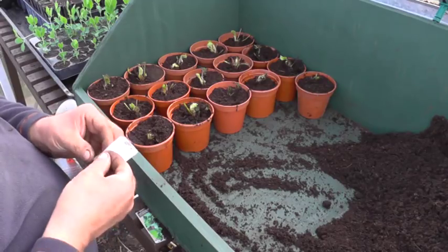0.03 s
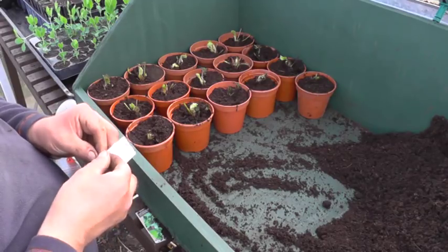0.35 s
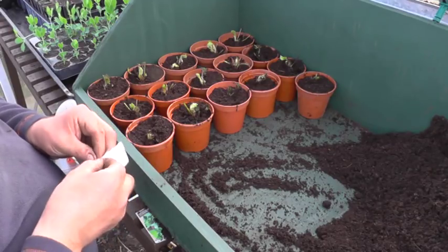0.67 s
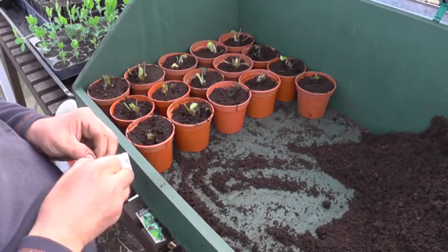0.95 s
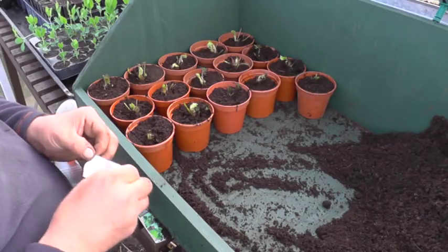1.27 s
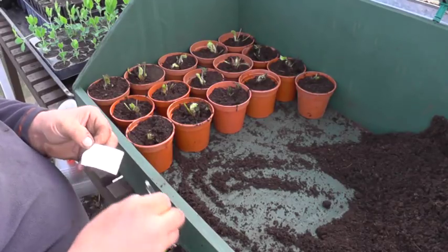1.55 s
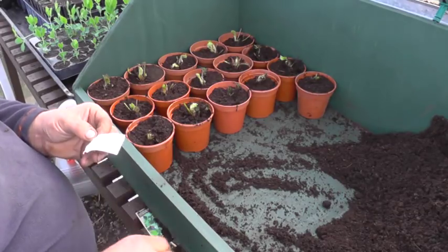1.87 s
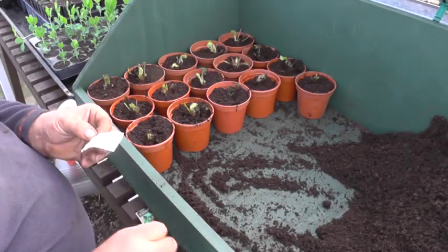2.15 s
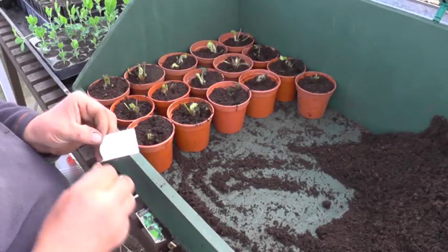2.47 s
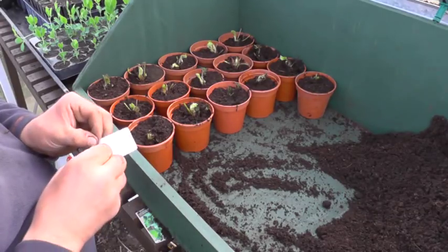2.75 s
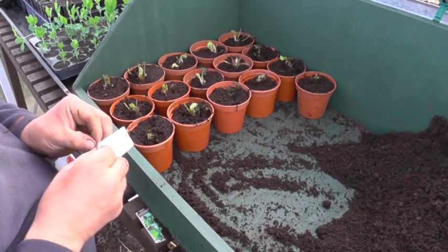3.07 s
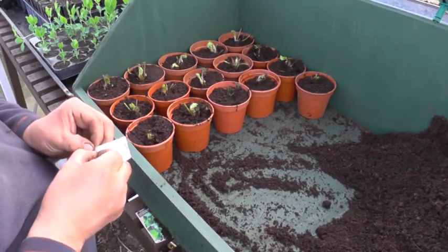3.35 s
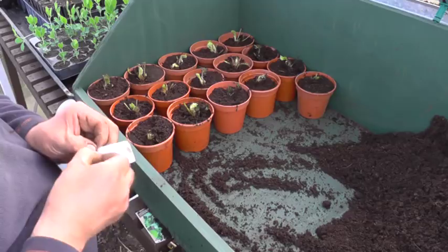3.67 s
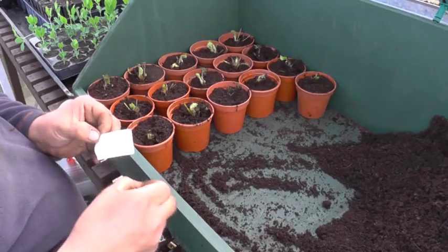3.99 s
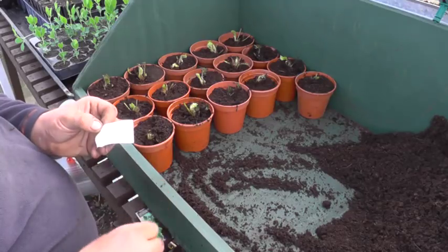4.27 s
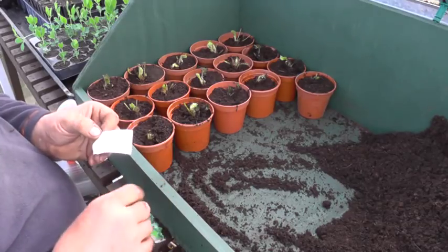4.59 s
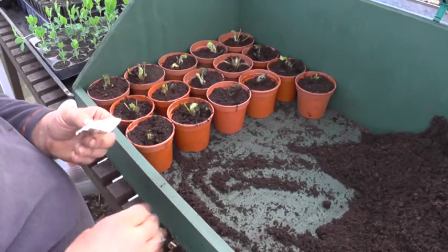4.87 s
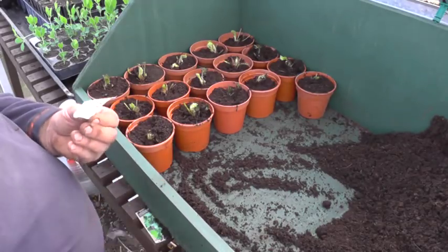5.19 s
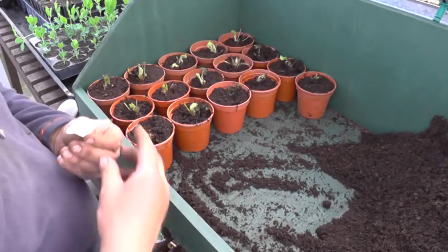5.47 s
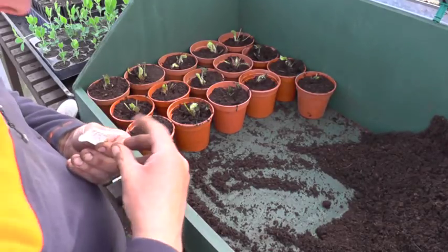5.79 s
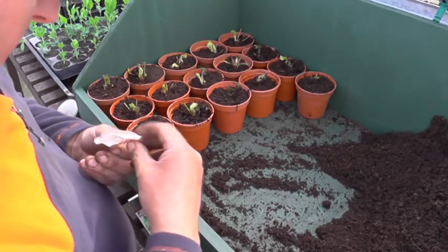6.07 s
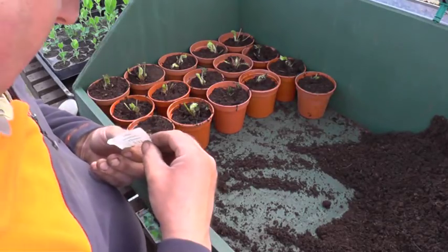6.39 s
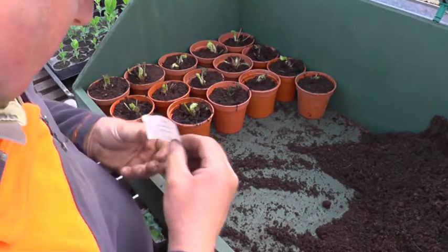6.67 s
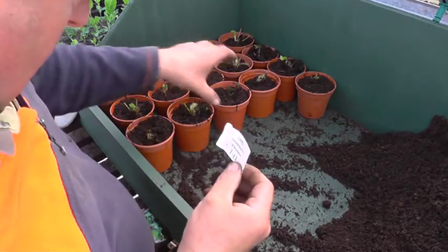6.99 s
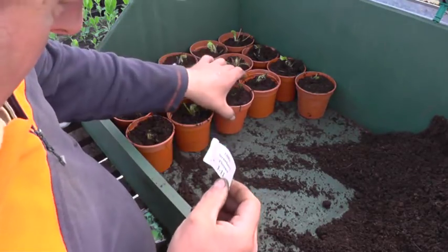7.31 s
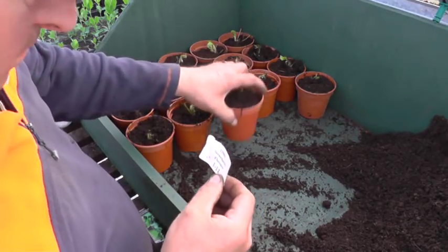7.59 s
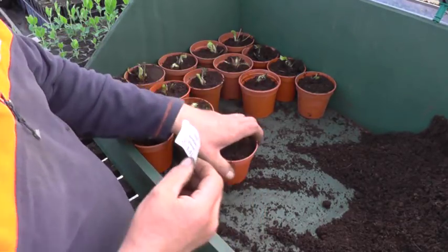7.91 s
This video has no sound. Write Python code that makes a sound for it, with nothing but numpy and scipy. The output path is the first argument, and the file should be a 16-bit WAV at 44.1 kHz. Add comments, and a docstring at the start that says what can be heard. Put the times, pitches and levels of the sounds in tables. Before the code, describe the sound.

Close by, fingernails tick at a sticky paper label, which peels from its backing in a quick run of snaps. After more light picking comes a second, shorter and louder rip. Fingers and sleeves rustle with faint taps on plastic, then a plant pot scrapes briefly over a gritty tray and bumps it with low knocks. Behind is a quiet garden with a faint, distant bird.

```python
"""Sticky paper labels are picked at and peeled off their backing: the glue lets go in runs of snaps.
Each pull speeds up or slows down as its force fades. Fingers and sleeves rustle at a potting bench,
then a plastic pot is gripped, dragged over a gritty tray and bumped against it.
Behind lies a quiet garden with a far bird. The microphone's automatic volume dips after loud rips."""
import sys
import numpy as np
from scipy import signal
from scipy.fft import rfft, irfft, next_fast_len
from scipy.io import wavfile
from scipy.ndimage import uniform_filter1d, map_coordinates

SR = 44100
rng = np.random.default_rng(int(sys.argv[2]) if len(sys.argv) > 2 else 0)


def bounce(signal):
    """Save signal as a 16-bit WAV file at the path given by the first command-line argument."""
    frames = np.transpose(np.atleast_2d(signal))
    limited = np.clip(frames, -1, 1)
    pcm = np.round(limited * 32767).astype(np.int16)
    wavfile.write(sys.argv[1], SR, pcm)


N = 355005
TIME = np.arange(N) / SR


def amp(db):
    """Turn decibels into a multiplier."""
    return 10 ** (np.asarray(db) / 20)


def unit(x):
    """Scale x to an average power of 1."""
    return x / np.sqrt(np.mean(x ** 2) + 1e-20)


def along(points, hz):
    """Read between (frequency, value) points on a log frequency axis."""
    f, v = np.transpose(points)
    return np.interp(np.log(hz + 1), np.log(f + 1), v)


def wobble(rate):
    """A smooth random curve through `rate` points a second."""
    return map_coordinates(rng.standard_normal(int(N * rate / SR) + 4), [TIME * rate])


def filtered(x, response):
    """Multiply each frequency in x by response(hz)."""
    n = x.shape[-1]
    padded = 2 * next_fast_len(n // 2 + 2048)
    return irfft(rfft(x, padded) * response(np.fft.rfftfreq(padded, 1 / SR)), padded)[..., :n]


def causal(db):
    """A filter with these gains that never sounds before the hit (minimum phase)."""
    cepstrum = irfft(np.log(amp(db)))
    half = len(cepstrum) // 2
    cepstrum[1:half] *= 2
    cepstrum[half + 1:] = 0
    return np.exp(rfft(cepstrum))


def stereo(pair, width):
    """Turn a middle and a side signal into left and right; more side sounds wider."""
    mid, side = filtered(pair, lambda hz: amp(np.array([0 * hz, along(width, hz)])))
    return np.array([mid + side, mid - side])


def add(track, s, sound):
    """Mix a sound in at s seconds."""
    part = track[:, max(round(s * SR), 0):][:, :sound.shape[-1]]
    part += sound[..., :part.shape[1]]


def burst(t60):
    """Two puffs of noise of set energy; t60 is the seconds they take to fade by 60 dB."""
    t = TIME[:SR // 5]
    noise = rng.standard_normal((2, len(t))) * amp(-60 * t / t60)
    return noise / np.linalg.norm(noise, axis=1, keepdims=True) * np.sqrt(SR / 1000)


# tone of the outdoor air: f/Hz, level/dB
GARDEN_TONE = [(20, -12.5), (45, -1), (85, 3.5), (160, -2.5), (260, -6.5), (480, -5), (680, -12.5),
               (900, -10.5), (1300, -20.5), (1700, -18), (2120, -22.5), (2450, -32.5), (4500, -35.5),
               (14000, -38.5)]
# how wide it sounds: f/Hz, side over middle/dB
GARDEN_WIDTH = [(60, -25), (180, -16), (550, -12), (1650, -12), (4970, -10), (15000, 2.5)]
def garden(patchy_db=2.56, level_db=-57.0, hum_db=-76.0, hum_hz=119.7):
    """A distant outdoor rumble whose pitches come and go, with a faint hum."""
    spectra = signal.stft(rng.standard_normal((2, N)), nperseg=2048)[2]
    patches = uniform_filter1d(rng.standard_normal(spectra.shape[1:]), size=3, axis=0)  # blur in pitch
    patches = uniform_filter1d(patches, size=16, axis=1)  # and in time
    patchy = signal.istft(spectra * amp(patchy_db * unit(patches)), nperseg=2048)[1][:, :N]
    air = unit(filtered(stereo(patchy, GARDEN_WIDTH), lambda hz: amp(along(GARDEN_TONE, hz))))
    hum = amp(hum_db + 2.5 * wobble(8.6)) * np.sin(2 * np.pi * hum_hz * TIME)
    return air * amp(level_db + 1.1 * wobble(1.6) + 0.59 * wobble(29)) + hum


def crack():
    """Fibres tear for about a millisecond, equally strong at every frequency."""
    spectrum = rfft(burst(.003)[:, :96])
    return irfft(spectrum / np.abs(spectrum)) * np.sqrt(SR / 1000)


# tone of snapping paper: f/Hz, level/dB
PAPER_TONE = [(40, -15), (260, -9.5), (500, -1.5), (880, -2), (1200, -3.5), (1500, -9.5), (1900, -2),
              (2400, -9.5), (3000, -2.5), (4500, -2), (6000, 0), (10000, -1.5), (15000, -8)]
# echoes from nearby surfaces: delay/s, level/dB
ECHOES = [(.0011, -16), (.0027, -9), (.0035, -13.5), (.0047, -15.5)]
def snap(body_db, top_db, flap_hz, taut_hz, flap_db, bench_t60, bench_db, taut_db=4.0):
    """Paper snaps: a sharp crack, its echoes, a flutter of the sheet and a shudder of the bench."""
    flutter = amp(-2.5) * burst(.024)
    blow = flutter + amp(bench_db) * burst(bench_t60)
    tear = crack()
    add(blow, 0, tear)
    for delay, db in ECHOES:
        add(blow, delay * (1 + 0.046 * rng.standard_normal()), amp(db) * tear)  # the hands keep moving
    tilt = [(1200, body_db), (5500, 0.0038), (11000, top_db)]
    flap = lambda hz: flap_db / (1 + ((hz - flap_hz) / 140) ** 2)  # the loose end rings
    taut = lambda hz: taut_db / (1 + ((hz - taut_hz) / 650) ** 2)  # so does the stretched paper
    return filtered(blow, lambda hz: causal(along(PAPER_TONE, hz) + along(tilt, hz) + flap(hz) + taut(hz)))


# how wide paper and fingers sound: f/Hz, side over middle/dB
PAPER_WIDTH = [(60, -5.5), (150, -4), (380, -7.5), (950, -4.5), (2380, -16), (5980, -8), (15000, 3.5)]
# spells of fumbling: start/s, end/s, level/dB
FUMBLING = [(0.054, 1.14, -57.5), (2.75, 3.561, -61), (5.601, 6.616, -57)]
# nails tick on paper edges: t/s, level/dB, body (low tones)/dB, top (high tones)/dB
NAIL_TICKS = [(.002, -39, -3, -9), (0.4837, -57, -20, 10.5), (0.7676, -44, 2, -10), (0.8434, -39, -19, -14),
              (0.9544, -54.5, -16, -9), (1.092, -59, 5.5, 20), (3.0349, -47.5, 0.5, -4),
              (3.3158, -42.5, 4, -2.5), (3.531, -53.5, -3, -9), (5.3917, -59, 1, 8), (5.6625, -49, 11, 5.5),
              (5.9476, -49.5, -6, -8), (6.04, -57, -13, 11), (6.145, -55.5, 8, -7), (6.6753, -27, -8, -10),
              (7.1691, -38, 4, -19), (7.1993, -43.5, 4, -8)]
def picking(faint_per_s=5, spread_db=2.5, faint_top_db=-3):
    """Nails pick at the corners: a few clear ticks among faint random ones."""
    out, faint = np.zeros((2, N)), []
    for start, end, db in FUMBLING:
        for place, strength in rng.random((round((end - start) * faint_per_s), 2)):
            s = start + place * (end - start)
            faint.append((s, db + spread_db * (2 * strength - 1), 0, faint_top_db))
    for s, db, body_db, top_db in NAIL_TICKS + faint:
        tick = snap(body_db, top_db, flap_hz=994, taut_hz=6500, flap_db=7.5,
                    bench_t60=0.094, bench_db=-4.5)
        add(out, s, amp(db) * tick)
    return stereo(out, PAPER_WIDTH)


# tone of rubbing fibres: f/Hz, level/dB
RUSTLE_TONE = [(100, -21), (500, 6), (1200, -4), (2400, -4.5), (4000, 1), (6000, 1.5), (10000, -1),
               (13000, -7), (15500, -13.5)]
# skin, paper and cloth slide: t/s, length/s, relative level/dB, top/dB
RUBS = [(0.064, 0.19, -61, -4), (0.4, 0.2, -64, 1.5), (2.751, 0.047, -61.5, -6), (2.89, 0.31, -75, -3),
        (3.405, 0.049, -59, -1.5), (4.528, 0.048, -58, 3), (4.814, 0.036, -62, 3),
        (4.916, 0.05, -57.5, 7.5), (5.05, 0.063, -45, 1.5), (5.114, 0.14, -48.5, 1),
        (5.594, 0.56, -68.5, 3), (6.531, 0.18, -55, -6), (7.157, 0.16, -51.5, -3.5),
        (7.316, 0.092, -62, -4), (7.534, 0.057, -53, -1.5), (7.603, .13, -61.5, -9), (7.717, 0.14, -45, -3),
        (7.862, 0.062, -38, -5.5), (7.923, 0.15, -52.5, -8)]
def rustle(grain_db=1.5, clump_db=1.7, level_db=-5, attack_s=0.011, release_s=0.033):
    """Sliding fibres catch and slip, so each rub makes a grainy hiss."""
    out = np.zeros((2, N))
    fibres = rng.standard_normal((2, N)) * amp(grain_db * wobble(900) + clump_db * wobble(90))
    hiss = unit(filtered(stereo(fibres, PAPER_WIDTH), lambda hz: causal(along(RUSTLE_TONE, hz))))
    for s, length, db, top_db in RUBS:
        end = length + release_s / 2
        part = hiss[:, round(s * SR):round((s + end) * SR)]
        t = TIME[:part.shape[1]]
        pressure = np.clip(np.minimum(t / attack_s, (end - t) / release_s), 0, 1)
        tilt = [(6500, 0), (11000, top_db)]
        add(out, s, filtered(amp(db) * pressure * part, lambda hz: amp(level_db + along(tilt, hz))))
    return out


def slip_times(count, first_gap, last_gap, lateness):
    """When the glue slips in one pull; the higher the lateness, the later the hand changes pace."""
    gaps = first_gap + (last_gap - first_gap) * np.linspace(0, 1, round(count) - 1) ** lateness
    return np.append(0, np.cumsum(gaps))


# pulls on a label: t/s, slips, first gap/s, last gap/s, lateness, relative level/dB,
# fade/dB (below 0 it grows), body/dB, top/dB, bench/dB, loose flap f/Hz, taut paper f/Hz
LABEL_PULLS = [(0.848, 2, .0167, 0.018, 0.9, -33.5, -3, 3.5, 7.5, 0, 824, 7030),
               (1.1488, 2, 0.0016, .0017, 1, -8, 2, -4, 3.5, -10.5, 880, 6500),
               (1.1828, 10, .0157, .0079, 1.9, -11.5, 5.5, 1, 1, 0.5, 906, 4660),
               (1.3617, 10, .0098, .0288, 6.2, -19.5, 9.5, 5.5, -1, 0, 1210, 6800),
               (3.7628, 8, 0.0051, .0268, 2.11, -2.5, 25, -6.5, -0.5, -4, 800, 2880)]
def peel(peel_db=-1.5, body_per_db=0.48, bench_per_db=0.234, dulling_db=3):
    """Glue tears loose slip by slip; weaker snaps are duller, with more of the bench in them."""
    out = np.zeros((2, N))
    for s, *pace, db, fade_db, body_db, top_db, bench_db, flap_hz, taut_hz in LABEL_PULLS:
        delays = slip_times(*pace)
        for delay, progress in zip(delays, np.linspace(0, 1, len(delays))):
            lost_db = fade_db * progress ** 6.5  # the force holds, then gives way near the end
            sound = snap(body_db + body_per_db * lost_db, top_db - dulling_db * progress, flap_hz, taut_hz,
                         flap_db=6.5, bench_t60=0.099, bench_db=bench_db + bench_per_db * lost_db)
            add(out, s + delay, amp(db + peel_db - lost_db) * sound)
    return stereo(out, PAPER_WIDTH)


# chirps: t/s, length/s, first f/Hz, last f/Hz, relative level/dB
CHIRPS = [(2.013, .035, 3700, 5620, -74.5), (2.108, .03, 3900, 5300, -72), (2.165, .028, 4600, 5300, -79),
          (2.498, .025, 4500, 5600, -79), (2.543, .027, 4900, 5250, -75), (4.433, .125, 3020, 3260, -73.5)]
def bird():
    """A far bird gives faint, rising whistles."""
    out = np.zeros((2, N))
    for s, length, first_hz, last_hz, db in CHIRPS:
        pitch = np.linspace(first_hz, last_hz, int(length * SR))
        whistle = np.sin(2 * np.pi * np.cumsum(pitch) / SR)
        add(out, s, amp(db + 1.5) * np.hanning(len(pitch)) * whistle)
    return out


def boom(hz, t60, rise_s=0.0036):
    """One low note swells and dies away after a soft knock."""
    t = TIME[:SR // 3]
    return -np.sin(2 * np.pi * hz * t) * amp(-60 * t / t60) * (1 - np.exp(-(t / rise_s) ** 2))


# the tray's own notes: f/Hz, level/dB, t60/s
TRAY_NOTES = [(104, -12.5, 0.23), (128, -2.5, 0.085), (184, -4.5, 0.19), (340, 5.5, 0.05)]
# knocks on the tray: t/s, level/dB, f/Hz that the struck spot favours
TRAY_BUMPS = [(2.125, -41.5, 204), (7.198, -43, 195), (7.362, -37.5, 195), (7.773, -28, 330),
              (7.791, -23.5, 190), (7.817, -20, 98), (7.867, -14.5, 121)]
def tray(pan_db=-1.3, spread_octaves=0.37):
    """Hands and the soil-filled pot bump the tray; each spot brings out its own low notes."""
    out = np.zeros((2, N))
    for s, db, spot_hz in TRAY_BUMPS:
        for hz, note_db, t60 in TRAY_NOTES:
            share = np.exp(-(np.log2(hz / spot_hz) / spread_octaves) ** 2)
            add(out, s, amp(db + note_db) * share * boom(hz, t60))
    return out * amp([[pan_db], [-pan_db]])


# puffs of air as the second label comes free: t/s, level/dB
AIR_PUFFS = [(3.7672, -4.5), (3.7814, -14)]
def puffs(push_s=0.00059, right_lag_s=.0008):
    """Each flick of the paper pushes the air once, with no ring."""
    out = np.zeros((2, N))
    age = np.maximum(TIME[:SR // 20] - np.array([[0], [right_lag_s]]), 0) / push_s
    for s, db in AIR_PUFFS:
        add(out, s, amp(db) * age * (2 - age) * np.exp(-age))
    return out


# how wide the jacket and the pot sound: f/Hz, side over middle/dB
HANDLING_WIDTH = [(60, -12.5), (240, -5), (950, -9.5), (3770, -10.5), (15000, 0)]
# tone of heavy cloth: f/Hz, level/dB
JACKET_TONE = [(100, -19), (450, -3), (900, 1), (1300, -2), (2000, -8), (3200, -16), (6000, -22),
               (12000, -38)]
# the rub swells as the body shifts and reaches: t/s, level/dB
REACH = [(5.05, -78), (5.23, -59), (5.35, -72), (5.75, -63), (6.3, -69.5), (7.2, -61.5), (7.45, -63.5),
         (7.65, -60), (8.05, -56.5)]
def jacket(fold_db=3.0, grain_db=2):
    """Heavy cloth folds with a dull, uneven rub as the arm reaches for a pot."""
    folds = rng.standard_normal((2, N)) * amp(fold_db * wobble(45) + grain_db * wobble(500))
    rub = unit(filtered(stereo(folds, HANDLING_WIDTH), lambda hz: amp(along(JACKET_TONE, hz))))
    return amp(np.interp(TIME, *np.transpose(REACH))) * rub


# the pot's own notes: f/Hz, width/Hz, level/dB
POT_NOTES = [(324, 80, -7), (528, 77, -5.5), (616, 40, 0.5), (772, 69, -2), (942, 97, -1), (1157, 50, -5),
             (1343, 68, -4), (1671, 66, -4), (1729, 69, -3.5), (2180, 17, -8.5), (2620, 310, -21.5)]
def pot_wall(hz):
    """A thin plastic wall acts as a filter that rings at its own notes."""
    return sum((-1) ** k * amp(db) * 1j * hz * width / (note ** 2 - hz ** 2 + 1j * hz * width)
               for k, (note, width, db) in enumerate(POT_NOTES))


# tone of a soft touch: f/Hz, level/dB
FINGER_TONE = [(250, 3), (700, -0.5), (1200, 3), (1700, -5), (3000, 3)]
# fingers land on the pot: t/s, level/dB
FINGER_TAPS = [(5.259, -29), (5.665, -23.5), (5.772, -27), (5.849, -27), (6.029, -26), (6.9393, -29),
               (7.0086, -29), (7.171, -33), (7.36, -26.5), (7.5669, -28), (7.6607, -24.5)]
def pot(grit_db=0.5, tap_t60=0.015, ring_db=-5, drag_at_s=7.798, drag_db=-20.5, hold_s=0.023):
    """Finger taps and the grit under its dragged base both make the pot ring."""
    taps = np.zeros((2, N))
    for s, db in FINGER_TAPS:
        add(taps, s, amp(db) * (burst(tap_t60) + amp(ring_db) * burst(.09)))
    taps = filtered(stereo(taps, HANDLING_WIDTH), lambda hz: pot_wall(hz) * causal(along(FINGER_TONE, hz)))
    grit = rng.standard_normal((2, N)) * amp(grit_db * wobble(1100))
    scrape = unit(filtered(stereo(grit, HANDLING_WIDTH), pot_wall))
    t = TIME - drag_at_s
    slide_db = drag_db + 614 * np.minimum(t, 0) - 468 * np.maximum(t - hold_s, 0)  # rise, fall in dB/s
    return taps + amp(slide_db) * scrape


def scene():
    """The hands work close by, a little to the left, with the garden behind."""
    near = peel() + picking() + puffs() + rustle() + jacket() + pot()
    return near * amp([[.5], [-.5]]) + tray() + bird() + garden()


def gain_control(x, threshold_db=-36, share=0.49, release_db_per_s=30):
    """Loud sounds pull the volume down at once; then it creeps back up."""
    power = np.abs(uniform_filter1d(np.mean(x ** 2, axis=0), size=441))
    cut_db = share * np.maximum(10 * np.log10(power + 1e-12) - threshold_db, 0)
    recovery_db = release_db_per_s * TIME
    held_db = np.maximum.accumulate(cut_db + recovery_db) - recovery_db
    return x * amp(-uniform_filter1d(held_db, size=64))


# the microphone's bright tone, with one narrow dip: f/Hz, level/dB
MIC_TONE = [(2000, -0.5), (4550, 0), (5100, 8), (6500, 8.5), (7200, 4.5), (7800, -3), (8800, 5),
            (11000, 3.5), (15000, -1.5), (16000, -16.5)]
def record(dry, ceiling=0.55, top_hz=16200):
    """The microphone colours the sound, turns loud parts down, rounds peaks and cuts the very top."""
    heard = gain_control(filtered(dry, lambda hz: causal(along(MIC_TONE, hz))))
    rounded = heard / (1 + (heard / ceiling) ** 4) ** (1 / 4)
    return filtered(rounded, lambda hz: hz < top_hz)


dry = scene()
out = record(dry)
bounce(out)
```